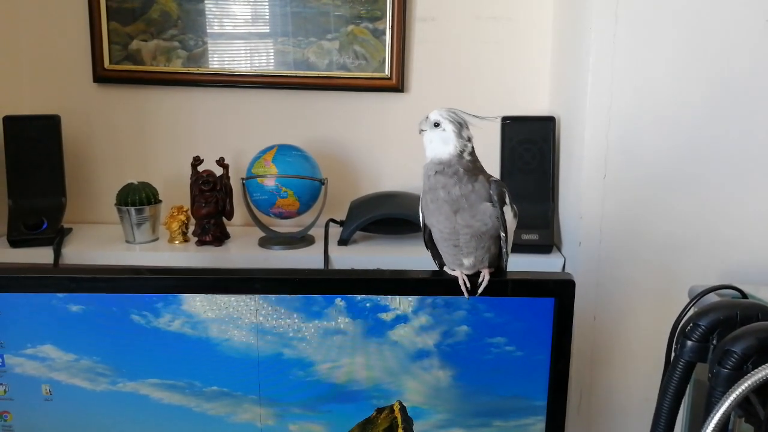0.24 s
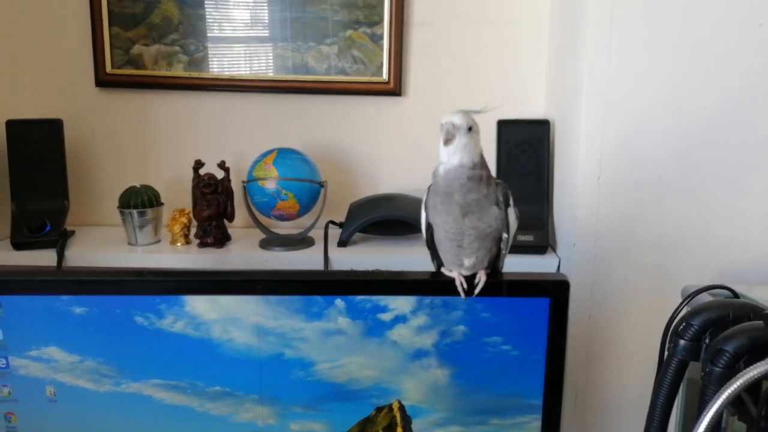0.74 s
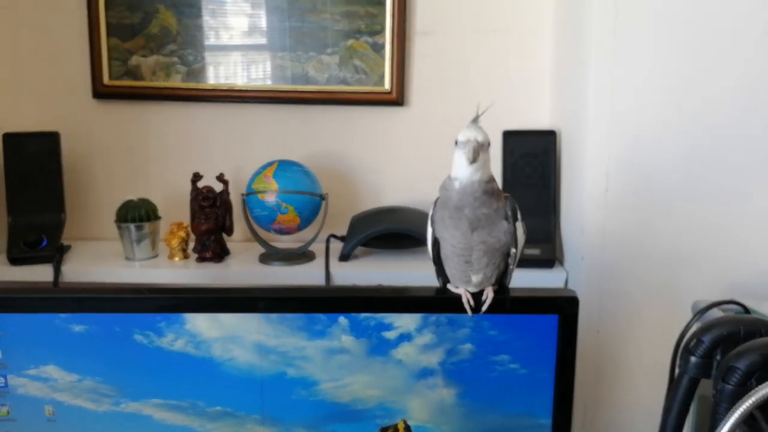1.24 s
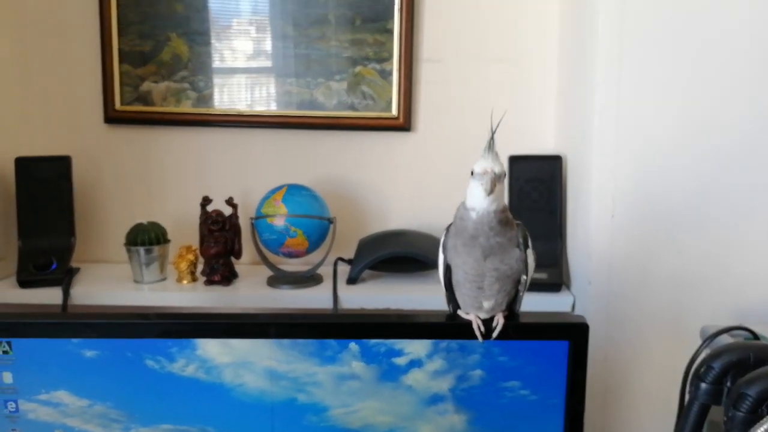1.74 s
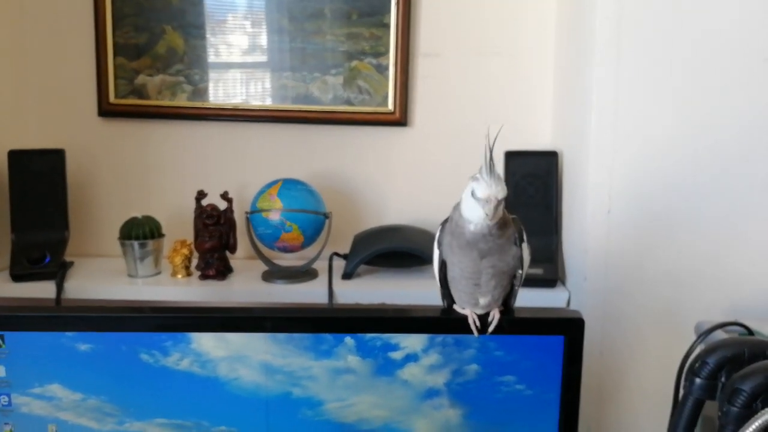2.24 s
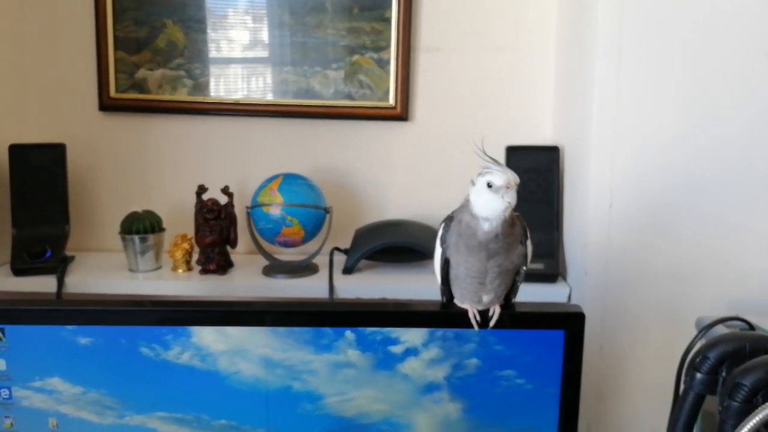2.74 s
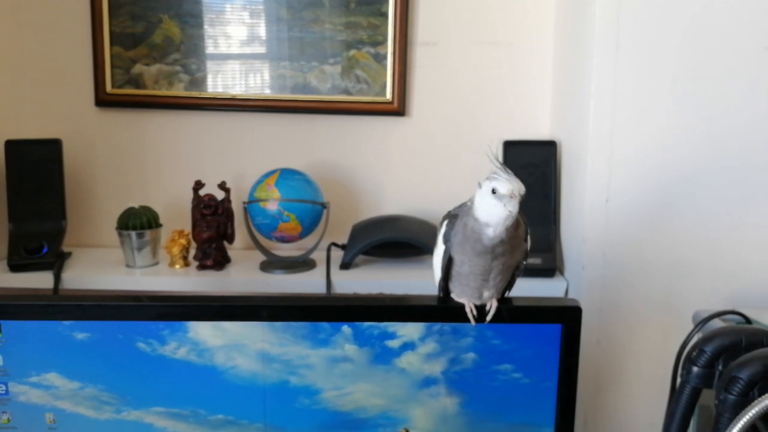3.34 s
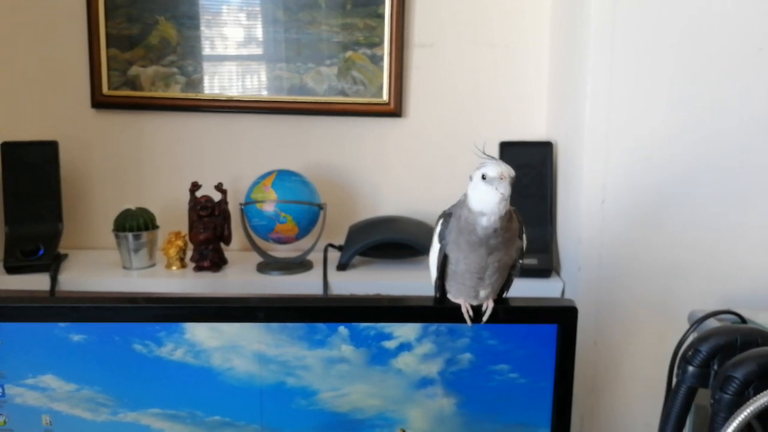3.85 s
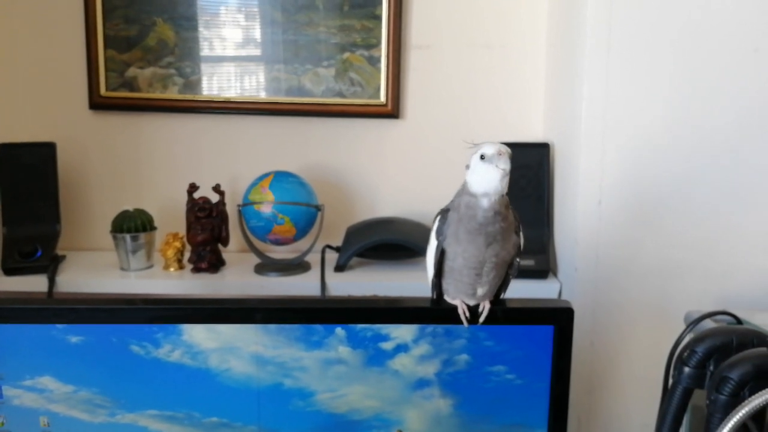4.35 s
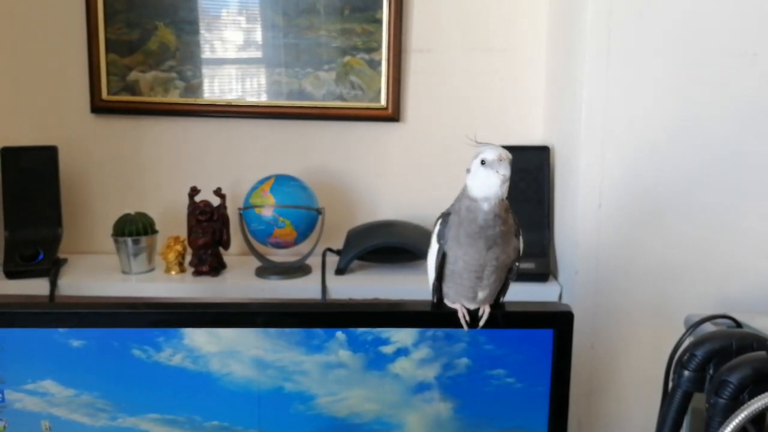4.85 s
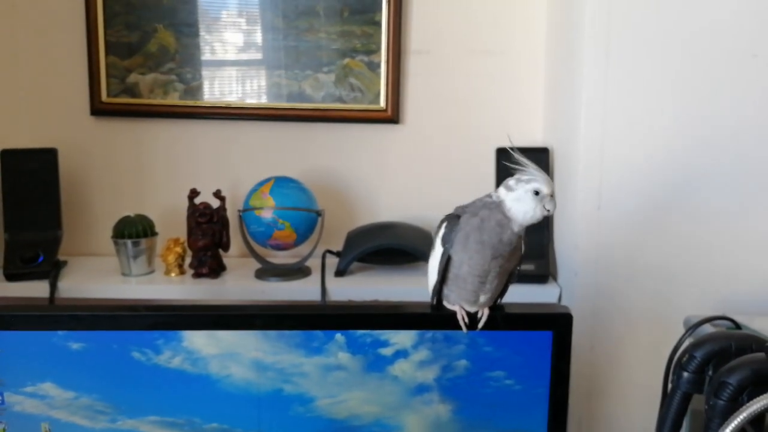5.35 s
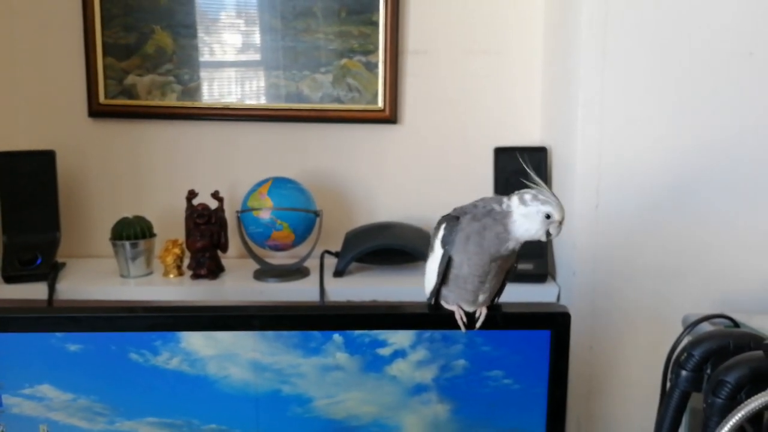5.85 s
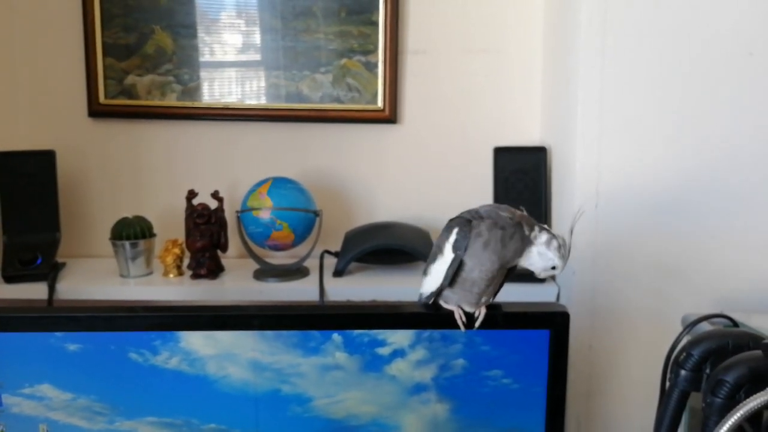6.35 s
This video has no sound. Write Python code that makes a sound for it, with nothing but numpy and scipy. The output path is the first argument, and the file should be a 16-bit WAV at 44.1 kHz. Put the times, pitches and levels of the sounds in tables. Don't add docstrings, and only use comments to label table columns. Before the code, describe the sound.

Indoors, close stereo pickup of one cockatiel singing in quick whistled notes around one and a half to two and a half kilohertz, some sweet, some reedy or raspy. A first swelling whistle is followed by a gap with a dim knock and a running motor that shuts off. Then chirps, pips and warbles come almost continuously, ending as the loud chirps return. Low hum, room air and tiny feather rustles lie beneath.

```python
import sys
import numpy as np
from scipy import signal
from scipy.io import wavfile
from scipy.ndimage import uniform_filter1d

SR = 44100
rng = np.random.default_rng(int(sys.argv[2]) if len(sys.argv) > 2 else 0)


def store_pcm(level_fs):
    pcm = np.round(np.clip(level_fs, -1, 1) * 32767).astype(np.int16)
    wavfile.write(sys.argv[1], SR, np.atleast_2d(pcm).T)


def gain_from_db(level_db):
    decades = np.asarray(level_db, float) / 20
    return 10 ** decades


N = 291501

# (frequency [Hz], t60 [s])
ROOM_T60 = [(500, 0.23), (1500, 0.33), (3000, 0.56), (7000, 0.53), (14000, 0.11)]
# (2nd, 3rd, 4th, 5th harmonic [dB re tone], rasp [dB re tone], subharmonic [dB re rasp])
PLAIN_VOICE = (-27, -28.5, -38, -41, -38, -15)


def evened(x):
    return x / np.sqrt(np.mean(x ** 2) + 1e-20)


def read(points, hz):
    f, value = np.transpose(points)
    return np.interp(np.log(hz + 1), np.log(f + 1), value)


def add(mix, s, sound):
    part = mix[..., round(s * SR):][..., :sound.shape[-1]]
    part += sound[..., :part.shape[-1]]


def wobble(count, hz):
    r = np.exp(-2 * np.pi * hz / SR)
    two_poles = np.convolve([1, -r], [1, -r])
    return evened(signal.lfilter([1], two_poles, rng.standard_normal(count + 4000))[4000:])


def panned(x, db):
    return x * np.sqrt(2 / (1 + gain_from_db(2 * np.array([-db, db]))))


def unfold(rows):
    s, *columns = np.transpose(rows)
    t = np.arange(s[0], s[-1], 1 / SR)
    return [np.interp(t, s, c) for c in columns]


def reverb(x, t60s, onset_s, rise_s=.001):
    taps = np.zeros((2, SR // 2 + SR // 4))
    count = taps.shape[1]
    slots = np.arange(round(onset_s * SR), count - 20, 20)
    at = slots + rng.integers(0, 20, (2, len(slots)))
    np.put_along_axis(taps, at, rng.choice([-1., 1.], at.shape), 1)
    taps = taps * (1 - np.exp(-np.arange(count) / (max(rise_s, 1e-4) * SR)))
    hz, t, z = signal.stft(taps, SR, nperseg=256)
    decay = gain_from_db(-60 * t / np.maximum(read(t60s, hz), .05)[:, None])
    tail = signal.istft(z * decay, SR, nperseg=256)[1]
    return signal.fftconvolve(x[None], tail / np.linalg.norm(tail[0]), axes=1)[:, :N]


def noise_floor(spectrum, db):
    # (frequency [Hz], left-right likeness [0-1])
    likeness = [(60, 0.72), (240, 0.82), (940, 0.057), (3740, 0.05), (14800, 0.94)]
    frames, hz = N // 256 + 5, np.fft.rfftfreq(1024, 1 / SR)
    a, b, c, d = rng.standard_normal((frames, 513, 4)).T
    same = np.clip(read(likeness, hz), -1, 1)[:, None]
    left = a + 1j * b
    right = same * left + np.sqrt(1 - same ** 2) * (c + 1j * d)
    z = np.array([left, right]) * gain_from_db(read(spectrum, hz))[:, None]
    return gain_from_db(db) * evened(signal.istft(z, nperseg=1024, noverlap=768)[1][:, :N])


def background():
    # (frequency [Hz], level [dB], width [Hz])
    mains_lines = [(49.5, -60, 2.5), (103.8, -70.5, 3.4), (154, -78, 3.), (201, -70, 2.8)]
    # (frequency [Hz], level [dB])
    motor_lines = [(100.3, -66), (200.5, -53.5), (300.8, -62)]
    # (time [s], level [dB])
    motor_run = [
        (0, 1.5),
        (1, 0),
        (1.6, -1),
        (2.12, 1.5),
        (2.24, -8.5),
        (2.4, -47.5),
    ]
    # (frequency [Hz], level [dB])
    air_spectrum = [(20, -11), (50, -11.5), (130, -19.5), (430, -24.5), (1000, -29), (1500, -30),
                    (3000, -37), (7000, -48.5), (15000, -56)]
    whirr_spectrum = [(20, -13.5), (200, -5), (800, -6), (1500, -20), (3000, -17.5), (15000, -43)]
    t = np.arange(N) / SR
    mains = np.zeros(N)
    for hz, db, width_hz in mains_lines:
        level = gain_from_db(db + 2.0 * wobble(N, width_hz))
        mains += level * np.cos(2 * np.pi * hz * t + 0.3 * wobble(N, width_hz))
    motor = np.zeros(N)
    for hz, db in motor_lines:
        motor += gain_from_db(db + 1.6 * wobble(N, 2.2)) * np.cos(2 * np.pi * (hz * t + rng.random()))
    running = gain_from_db(np.interp(t, *np.transpose(motor_run)))
    hum = np.sqrt(2) * (mains * gain_from_db([[-1.], [1.]]) + running * motor * gain_from_db([[2.], [-2.4]]))
    return hum + noise_floor(air_spectrum, -62) + running * noise_floor(whirr_spectrum, -60.5)


def ducking(song):
    power_db = 10 * np.log10(abs(uniform_filter1d((song ** 2).mean(0), 900)) + 1e-12)
    rise_db = np.arange(N) * 48.0 / SR
    held_db = np.maximum.accumulate(power_db + rise_db) - rise_db
    over_db = np.maximum(held_db + 22.5, 0)
    return gain_from_db(-.8 * uniform_filter1d(over_db, 1500))


def far_sounds():
    # (start [s], top pitch [Hz], level [dB], half tone on the way down [dB])
    calls = [
        (.748, 3046, -28, -17),
        (4.438, 2987, -30.5, -49),
    ]
    # (time after start [s], pitch ratio, level [dB], 2nd harmonic [dB])
    call_arch = [(0, .56, -23.5, 1.5), (.03, .71, -7, -14.5), (.055, .81, -1, -15), (.072, .95, 3, -20),
                 (.128, 1.001, -6.5, -25.5), (.148, .77, -3, -9), (.185, .6, -14, 1.5),
                 (.24, .555, -26, 9.5), (.33, .52, -32, -12.5)]
    # (frequency [Hz], width [Hz], level [dB])
    knock_modes = [(1610, 27, -3.5), (1910, 29, 0), (3954, 35, -6), (4907, 46, -17.5)]
    # (frequency [Hz], t60 [s])
    hall_t60 = [(800, 0.4), (2200, 0.45), (4000, 0.4), (9000, 0.351)]
    far = np.zeros(N)
    for start, top_hz, db, falling_db in calls:
        ratio, level_db, second_db = unfold(call_arch)
        count = len(ratio)
        falling = np.arange(count) > ratio.argmax()
        half_db = np.where(falling, falling_db, -42.)
        turns = 2 * np.pi * np.cumsum(top_hz * ratio * (1 + .011 * wobble(count, 200))) / SR
        octave = np.cos(0.95 * 2 * turns) * (0.28 + .9 * wobble(count, 220))
        tone = np.cos(turns) + gain_from_db(second_db) * octave + gain_from_db(half_db) * np.cos(turns / 2)
        tone = tone * (1 + .25 * wobble(count, 100))
        hoarse_top = (np.cos(3 * turns) + np.cos(4 * turns)) * wobble(count, 1000)
        tone += gain_from_db(second_db - 24.0) * hoarse_top
        add(far, start, np.sqrt(2) * gain_from_db(db + level_db) * tone)
    t = np.arange(2000) / SR
    ring = sum(gain_from_db(db - 60 * t / 0.024) * np.sin(2 * np.pi * hz * t) for hz, _, db in knock_modes)
    add(far, 1.436, gain_from_db(-34) * ring)
    return reverb(far, hall_t60, 0.0017, rise_s=.012)


def scuffs():
    # (start [s], length [s], level [dB], centre [Hz], width [Hz])
    puffs = [
        (0.288, 0.12, -42, 980, 288.7),
        (1.257, 0.072, -46.5, 1179, 1562),
        (2.327, 0.071, -51.5, 543.6, 407),
        (2.893, 0.074, -47, 699.6, 621.6),
        (4.161, 0.077, -51, 522.5, 602.5),
    ]
    out = np.zeros((2, N))
    for s, length_s, db, hz, width_hz in puffs:
        t = np.arange(round(length_s * SR)) / SR
        puff = [wobble(len(t), width_hz / 2) * np.cos(2 * np.pi * hz * t + side) for side in (0, 1)]
        add(out, s, gain_from_db(db) * np.array(puff) * np.hanning(len(t)))
    return out + gain_from_db(-1.5) * reverb(out.mean(0), ROOM_T60, 0.0053)


def pip(start, length, first_hz, last_hz, db):
    corner_db = (-11.5, -1.5, 1, -19.5)
    s = [0, 0.0045, length - 0.0094, length]
    hz = [0.87 * first_hz, first_hz, last_hz, last_hz]
    return np.transpose([start + np.array(s), hz, db + np.array(corner_db)])


def sung(course, start, length, hz, db):
    return np.array(course) * [length, hz, 1] + [start, 0, db]


def voiced(rows, voice, second_per_db):
    # (time [s], left-right [dB])
    head_turn = [(0, -1), (.55, 1), (2.5, -3), (3.3, -1), (4.2, -4), (6, -0.5), (6.5, -4.5)]
    s, hz, level_db, *given = np.transpose(rows)
    second_db, *upper_db, rasp_db, sub_db = voice
    weak_db = level_db.max() - level_db
    second_db = np.minimum(second_db + second_per_db * weak_db, 11)
    rasp_db = given[0] if given else rasp_db + np.minimum(2.4 * weak_db, 11.5)
    turn_db = np.interp(s[0], *np.transpose(head_turn))
    return np.transpose([s, hz, level_db, second_db, rasp_db]), (*upper_db, sub_db, turn_db)


def pips():
    # (start [s], length [s], first pitch [Hz], last pitch [Hz], level [dB])
    plain_pips = [
        (0.118, .041, 1615, 1525, -19),
        (3.285, 0.041, 1563, 1636, -18.5),
        (3.825, .047, 1581, 1629, -18),
    ]
    dull_pips = [
        (3.17, 0.044, 1597, 1543, -20),
    ]
    dull = (-32.5, -29.5, -45, -44, -36.5, -15.5)
    notes = [voiced(pip(*row), PLAIN_VOICE, 0.52) for row in plain_pips]
    return notes + [voiced(pip(*row), dull, .4) for row in dull_pips]


def arched_notes():
    # (share of length, pitch ratio, level [dB])
    opener = [(0, 1.4, -16.5), (.07, 1.07, 1.5), (.3, 1.02, -1.5), (.65, .99, 0), (.75, .965, -6),
              (.85, .975, 0.5), (.91, .93, -2.5), (1, 1, -2)]
    long_arch = [(0, .87, -15.5), (.2, .925, -4), (.55, .995, 0), (.64, 1.001, -3), (.8, .985, -6.5),
                 (.89, .91, -10.5), (1, 0.65, -39.5)]
    high_arch = [(0, .79, -14), (.3, .93, -1.2), (.55, .99, 0), (.78, 1.001, -4.5), (.85, .95, -20),
                 (1, .7, -25)]
    broken_arch = [(0, .8, -13.5), (.12, .85, -9), (.22, .885, -0.5), (.36, .93, 2.5), (.52, .97, -5.5),
                   (.64, 1.005, -16), (.78, .995, -4.5), (.88, .94, -8), (1, 0.67, -25)]
    hook = [(0, .925, -13), (.2, .95, -6.5), (.62, 1.001, 1.5), (.8, .98, -7.5), (1, 0.71, -22)]
    flat_hook = [(0, .99, -12), (.2, .995, -2), (.5, 1.001, 0), (.8, .995, -5), (1, .75, -20)]
    scoop = [(0, .84, -16.5), (.23, .855, -4), (.55, .95, -2), (.8, 1.001, -2.5), (1, .82, -19.5)]
    slow_scoop = [(0, .8, -17), (.25, .83, -10.5), (.4, .89, -3), (.6, .96, -1.5), (.88, 1.001, -2.5),
                  (1, .85, -23)]
    # (start [s], length [s], pitch [Hz], level [dB])
    openers = [
        (2.099, .115, 1287, -34),
        (5.535, .136, 1291, -32.5),
    ]
    long_arches = [
        (2.399, .108, 2038, -12.5),
        (5.833, .109, 2037, -13),
    ]
    high_arches = [
        (2.538, .065, 2444, -13),
    ]
    broken_arches = [
        (5.972, .059, 2350, -12),
    ]
    hooks = [
        (2.659, .043, 1835, -21),
    ]
    low_hooks = [
        (3.936, .05, 1398, -22),
    ]
    dull_hooks = [
        (6.09, 0.049, 1816, -20),
    ]
    scoops = [
        (2.778, .043, 1695, -17.5),
    ]
    slow_scoops = [
        (6.206, .053, 1762, -16.5),
    ]
    low = (-21.5, -27.5, -34.5, -34, -35.5, 12)
    bright = (-13.5, -11.5, -22.5, -28, -51, -25.5)
    reedy = (1.5, -15, -17.5, -26.5, -51.5, -21)
    smooth = (-28, -37, -45, -41, -49.5, -12.5)
    mellow = (-20.5, -29, -30, -33, -37.5, -23.5)
    nasal = (-5, -13.5, -24.5, -32, -46, -24)
    groups = [(opener, openers, low, .3),
              (long_arch, long_arches, bright, 1.25),
              (high_arch, high_arches, bright, 1.6),
              (hook, hooks, reedy, .5),
              (scoop, scoops, smooth, 1.6),
              (flat_hook, low_hooks, mellow, 1.2),
              (broken_arch, broken_arches, bright, .8),
              (hook, dull_hooks, nasal, .6),
              (slow_scoop, slow_scoops, smooth, .8)]
    notes = []
    for course, rows, voice, second_per_db in groups:
        notes += [voiced(sung(course, *row), voice, second_per_db) for row in rows]
    return notes


def free_notes():
    # (time [s], pitch [Hz], level [dB], rasp [dB re tone])
    slides = [
        [(0.0, 2571, -14.5, -26), (.029, 2529, -18.5, -36.5), (.035, 2480, -20, -25.5),
         (.039, 1960, -17.5, -25), (.052, 2043, -34, -17)],
        [(3.047, 2498, -42, -44.5), (3.053, 2435, -25, -32), (3.074, 2260, -31, -24.5), (3.105, 1603, -28, -15),
         (3.12, 1511, -33.5, -25.5), (3.125, 1350, -37, -13.5)],
        [(3.697, 2124, -29.5, -31), (3.717, 2190, -28.5, -24), (3.727, 1923, -16.5, -32.5),
         (3.757, 1577, -24, -39.5), (3.769, 1523, -24.5, -27.5)],
        [(6.507, 2373, -20.5, -28.5), (6.523, 2516, -25, -27.5), (6.533, 1818, -19.5, -35.5),
         (6.559, 1612, -20, -36), (6.566, 1593, -37, -26.5)],
    ]
    warbles = [
        [(.245, 1400, -29.5, -34.5), (.26, 1377, -34, -24), (.278, 1397, -29.5, -16.5), (.299, 1420, -47, -12)],
        [(3.563, 1924, -27, -33.5), (3.572, 1856, -19.5, -39.5), (3.587, 1755, -30.5, -23.5),
         (3.603, 1716, -31, -25.5), (3.637, 1824, -23, -24), (3.655, 1790, -39.5, -14)],
    ]
    whistles = [
        [(.367, 1312, -28.5, -36.5), (.4, 1406, -27.5, -25.5), (.408, 1456, -23.5, -27),
         (.451, 1910, -22, -28.5), (.477, 1995, -26.5, -27), (.52, 1961, -19.5, -31.5),
         (.545, 1912, -13, -57.5), (.606, 1939, -10.5, -61.5), (.626, 1850, -28, -40), (.677, 1569, -18, -39.5),
         (.689, 1420, -37, -40)],
        [(4.071, 1315, -34.5, -11.5), (4.106, 1415, -21, -53), (4.129, 1615, -19, -54.5),
         (4.134, 1690, -28.5, -50), (4.142, 1855, -17.5, -48.5), (4.164, 2060, -25.5, -24.5),
         (4.172, 2348, -32, -13.5), (4.2, 2390, -38.5, -18)],
        [(4.2, 1709, -30, -20.5), (4.256, 1876, -9.5, -54.5), (4.289, 1964, -15, -67.5),
         (4.297, 2066, -24, -58.5), (4.311, 1996, -17.5, -40.5), (4.336, 1790, -29.5, -34),
         (4.347, 1529, -26, -27.5), (4.374, 1215, -36, -26.5)],
    ]
    flick = [(3.418, 1440, -24.5, -34), (3.431, 1600, -17.5, -32.5), (3.446, 1774, -30, -45),
             (3.455, 1973, -16.5, -53.5), (3.465, 2056, -25, -44)]
    hoarse = (-26, -30.5, -45, -47, -31, 2.5)
    croaky = (-23, -32, -34, -45, -32, 11)
    clear = (-29, -38.5, -40, -46.5, -50, 3)
    notes = [voiced(rows, hoarse, .1) for rows in slides]
    notes += [voiced(rows, croaky, .6) for rows in warbles]
    notes += [voiced(rows, clear, 0.23) for rows in whistles]
    return notes + [voiced(flick, PLAIN_VOICE, 0.51)]


def buzzes():
    # (time [s], pitch [Hz], level [dB], rasp [dB re tone])
    buzz_rows = [
        [(2.92, 1938, -31.5, -23), (2.93, 2008, -27.5, -30), (2.947, 1841, -23, -24),
         (2.966, 1866, -21.5, -33.5), (2.993, 2032, -22.5, -31), (3.005, 2060, -50.5, -36.5)],
        [(6.356, 2123, -37.5, -22), (6.367, 2180, -28.5, -24.5), (6.41, 2247, -23.5, -19),
         (6.42, 2275, -23.5, -25), (6.439, 2090, -22.5, -39), (6.446, 1880, -36, -37)],
    ]
    buzzy = (-31.5, -39, -45.5, -45.5, -31, 3.5)
    return [voiced(rows, buzzy, -1.0) for rows in buzz_rows]


def note(rows, voice, repeat):
    # (frequency [Hz], left-right [dB])
    tone_pan = [(1300, 0), (1600, 9), (2000, 6.5), (2400, -2)]
    overtone_pan = [(2500, -1.5), (4400, 11.5), (6000, 7), (8000, -14), (11000, 5), (15000, 1.5)]
    # (frequency [Hz], level [dB])
    throat = [(2600, 3.5), (3600, 0), (4200, 0.16), (4900, -2), (6200, 1.51), (7600, -6), (10000, 0.1),
              (13000, -3.5)]
    hz, level_db, second_db, rasp_db = unfold(rows)
    third_db, fourth_db, fifth_db, sub_db, pan_db = voice
    count = len(hz)
    level_db = uniform_filter1d(level_db, size=120)
    rasp = gain_from_db(np.minimum(2.0 * (rasp_db + 27), 6.) - 27.5)

    slope = abs(np.gradient(np.log(hz))) * SR
    slope = uniform_filter1d(uniform_filter1d(slope, size=300), size=300)
    slide = np.tanh(slope / 15.0)

    jitter = .003 + np.minimum(0.18 * rasp, .011) + 0.0024 * slide
    turns = 2 * np.pi * np.cumsum(hz * (1 + jitter * wobble(count, 150))) / SR
    stutter = 1 + np.minimum(gain_from_db(11.0) * rasp + 0.22 * slide, .6) * wobble(count, 73)

    skips = np.cos(turns / repeat) + .5 * (repeat > 2) * np.cos(2 * turns / repeat)
    skips = skips * gain_from_db(sub_db - 29.0 + 4.1 * np.minimum(rasp_db + 37, 0))
    skips = skips * (1 + .5 * wobble(count, 74))
    grain = rasp * gain_from_db(13.5 + 2.5 * wobble(count, 90)) * wobble(count, 600)
    uneven = grain + skips
    breath = rasp * gain_from_db(-19.5 + 6.6 * wobble(count, 80)) * wobble(count, 3500)
    breath = breath * (1 + np.cos(turns)) ** 2

    grain_band = signal.butter(2, [1000, 3100], "band", fs=SR)
    skip_band = signal.butter(2, [800, 3600], "band", fs=SR)
    rough = signal.lfilter(*grain_band, np.cos(turns) * grain) + np.gradient(breath)
    rough += signal.lfilter(*skip_band, np.cos(turns) * skips)
    out = panned(np.cos(turns) * stutter + rough, pan_db + read(tone_pan, hz))

    heights_db = [second_db, third_db, fourth_db, fifth_db] + [fifth_db - 7.3 * k for k in range(1, 6)]
    softness_db = (level_db - level_db.max()) * 0.032
    blur = np.clip(.022 * (rasp_db + 45) + .3 * slide, .18, .9)
    for k, db in enumerate(heights_db, 2):
        db = db + read(throat, k * hz) + 3.6 * wobble(count, 62) + (k > 2) * softness_db
        db = db - 2.5 * slide ** 2 - np.maximum(k * hz - 11000, 0) / 400
        grip = np.sqrt(1 - blur ** 2) * stutter + blur * wobble(count, 46.0 * k)
        overtone = gain_from_db(db) * np.cos(k * turns + k ** 2) * (grip + 1.1 * uneven)
        out += panned(overtone, read(overtone_pan, k * hz))
    fade = signal.windows.tukey(count, min(1, 0.0077 * SR / count))
    return rows[0][0], np.sqrt(2) * gain_from_db(level_db) * out * fade


def singer():
    # (left delay [s], right delay [s], level [dB])
    bounces = [
        (.0031, 0.0028, -19),
        (.0083, 0.0082, -8.5),
        (0.012, 0.027, -15),
    ]
    song = np.zeros((2, N))
    for rows, voice in pips() + arched_notes() + free_notes():
        add(song, *note(rows, voice, 2))
    for rows, voice in buzzes():
        add(song, *note(rows, voice, 3))
    song[0] = np.roll(song[0], 4)
    middle = song.mean(0)
    heard = song + gain_from_db(-9.0) * reverb(middle, ROOM_T60, .01)
    for left_s, right_s, db in bounces:
        add(heard[0], left_s, gain_from_db(db) * middle)
        add(heard[1], right_s, -gain_from_db(db) * middle)
    return heard


def scene():
    song = singer()
    return ducking(song) * background() + far_sounds() + scuffs() + song


def top_cut(x):
    return signal.sosfilt(signal.butter(12, 15250, fs=SR, output="sos"), x)


def record(dry):
    return top_cut(dry)


dry = scene()
out = record(dry)
store_pcm(out)
```